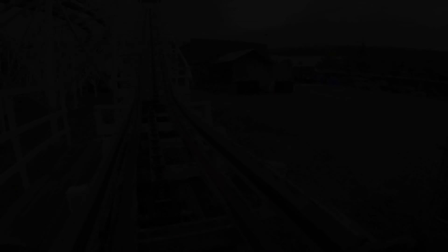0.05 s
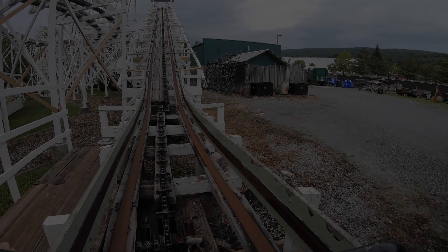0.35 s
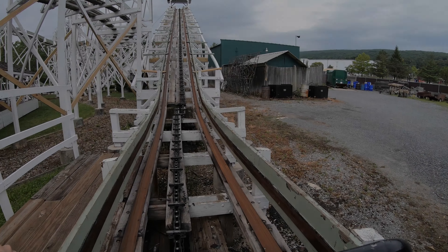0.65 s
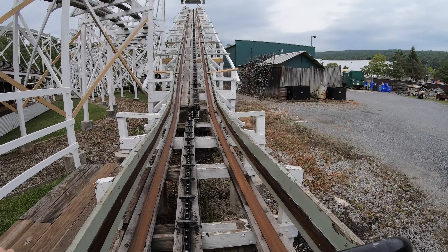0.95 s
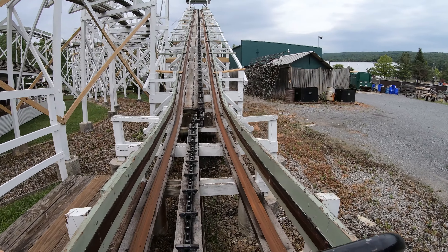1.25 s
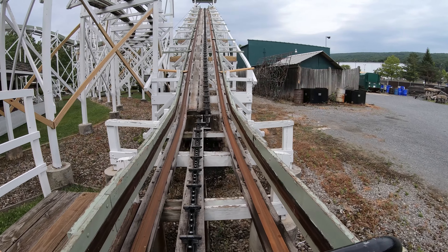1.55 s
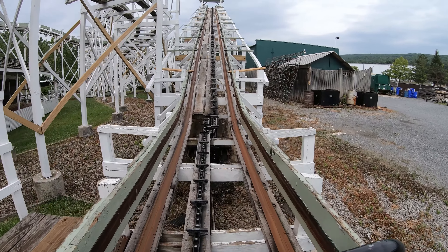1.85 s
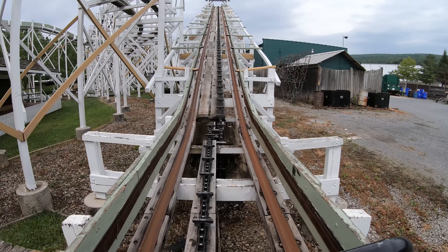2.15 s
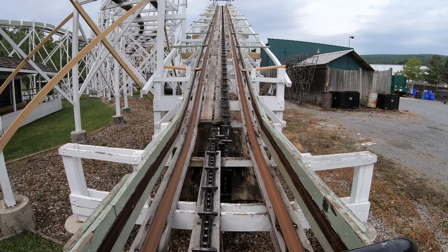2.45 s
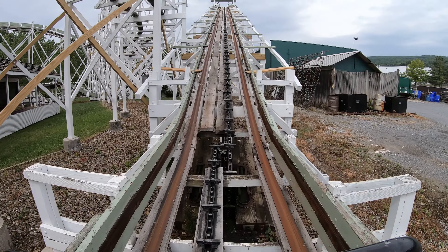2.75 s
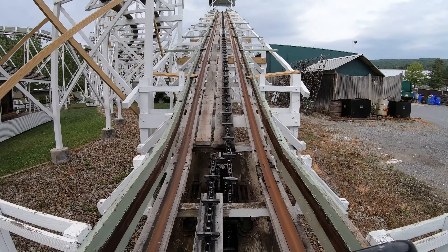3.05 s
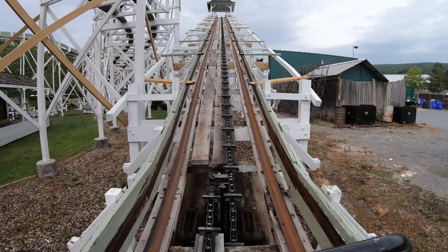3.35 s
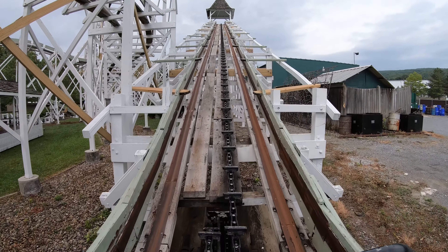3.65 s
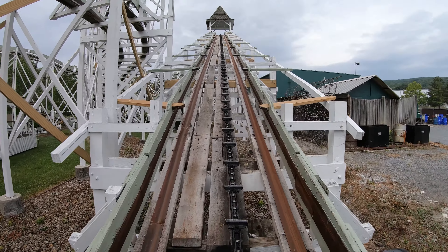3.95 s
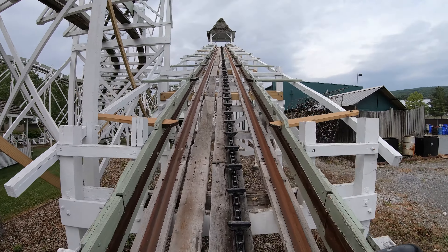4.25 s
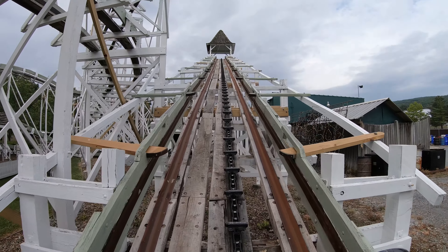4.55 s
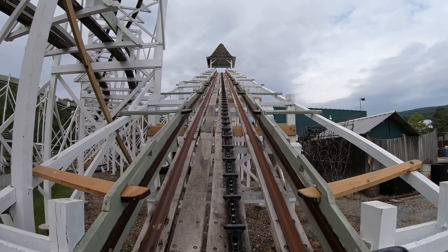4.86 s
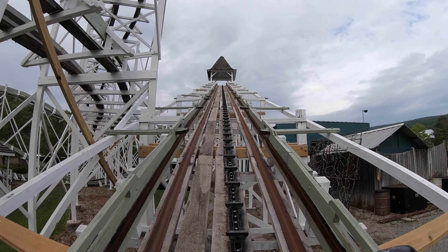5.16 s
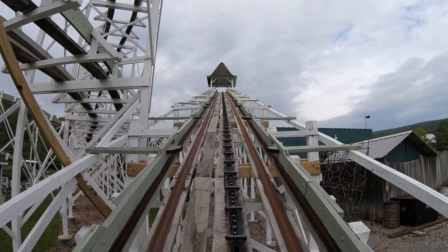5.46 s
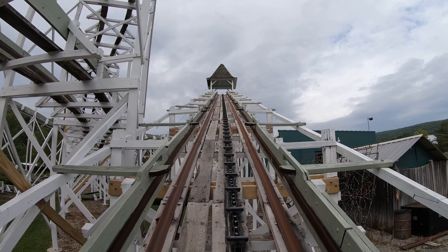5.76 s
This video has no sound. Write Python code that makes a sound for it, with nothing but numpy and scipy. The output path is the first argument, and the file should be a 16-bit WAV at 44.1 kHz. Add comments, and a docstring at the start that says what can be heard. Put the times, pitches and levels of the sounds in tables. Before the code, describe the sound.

Steel wheels chatter over booming timber as a roller coaster rolls along, with sharp metal clanks and chain rattle near the end.

```python
"""The front car of a wooden roller coaster, rolling through a dip and onto the lift hill.
Steel wheels chatter and knock on the rails, so the car rumbles and the timber track booms and sings.
Loose fittings tick and clank, rubbing steel squeaks, and air buffets the microphone.
From about four seconds the lift chain rattles underneath; the car's steel dogs clank and scrape on it."""
import sys
import numpy as np
from scipy import signal
from scipy.fft import rfft, irfft, next_fast_len
from scipy.io import wavfile
from scipy.ndimage import uniform_filter1d, map_coordinates

SR = 44100
rng = np.random.default_rng(int(sys.argv[2]) if len(sys.argv) > 2 else 0)


def put_to_file(sound):
    """Save the sound as 16-bit audio at rate SR, in the file named by the first command-line argument."""
    columns = np.atleast_2d(sound).T  # one column per channel
    safe = np.clip(columns, -1, 1)
    whole_steps = np.round(safe * 32767)
    wavfile.write(sys.argv[1], SR, whole_steps.astype(np.int16))


N = 256220
T = np.arange(N) / SR


def amp(db):
    """Decibels to gain."""
    return 10 ** (np.asarray(db) / 20)


def unit(x):
    """Scale to rms 1."""
    return x / np.sqrt(np.mean(x ** 2) + 1e-20)


def automation(points):
    """A (time, value) breakpoint curve, one value per sample."""
    return np.interp(T, *np.transpose(points))


def fade_in(power):
    """Gain that grows from silence to 1 over 0.85 s, as a power of time."""
    return np.clip(T / 0.85, 1e-6, 1) ** power


def swells(rows, rise_s, fall_s):
    """A fader ride in dB: each swell rises, holds until its length is up and falls back."""
    return sum(db * np.clip(np.minimum((T - s) / rise_s, 1 - (T - s - length) / fall_s), 0, 1)
               for s, length, db in rows)


def wobble(rate):
    """A smooth random curve, rate knots a second."""
    return map_coordinates(rng.standard_normal(int(N * rate / SR) + 4), [T * rate])


def eq(x, outline):
    """x through a minimum-phase filter with the given (Hz, dB) outline."""
    size = 2 * next_fast_len(len(x) // 2 + 2048)
    hz, db = np.transpose(outline)
    bin_db = np.interp(np.log(np.fft.rfftfreq(size, 1 / SR) + 1), np.log(hz), db)
    cepstrum = irfft(np.log(amp(bin_db)), size)
    cepstrum[1:size // 2] *= 2  # folding onto positive time makes the filter causal
    cepstrum[size // 2 + 1:] = 0
    return irfft(rfft(x, size) * np.exp(rfft(cepstrum)), size)[:len(x)]


def levelled(x, window_s):
    """x with its slow level ridden to rms 1."""
    size = int(window_s * SR) + 1
    power = uniform_filter1d(uniform_filter1d(x ** 2, size), size)
    return x / np.sqrt(np.abs(power) + 1e-12)


def add(track, s, sound):
    """Mix a sound into a track at s seconds."""
    room = track[max(round(s * SR), 0):][:len(sound)]
    room += sound[:len(room)]


def contacts(rate, jitter, spread_db):
    """Unevenly spaced impulses, about rate a second, with random size and sign."""
    gap, size, side = rng.standard_normal((4000, 3)).T
    at = (np.cumsum(np.exp(jitter * gap - jitter ** 2 / 2)) / rate * SR).astype(int)
    strength = amp(spread_db * np.tanh(size / 2) * 2) * np.sign(side)
    return np.bincount(at[at < N], strength[at < N], N)


def shaken(blows, t60, share):
    """Each blow sets loose parts buzzing briefly; share is the power in the buzz."""
    t = np.arange(SR // 4) / SR
    energy = np.abs(signal.fftconvolve(blows ** 2, amp(-60 * t / t60) ** 2)[:N])
    buzz = unit(np.sqrt(energy) * rng.standard_normal(N))
    return np.sqrt(1 - share) * unit(blows) + np.sqrt(share) * buzz


def hit(outline, t60, push):
    """One blow of peak 1: a sharp push and a dying scatter through a body's colour."""
    t = np.arange(SR // 6) / SR
    force = amp(-60 * t / t60) * rng.standard_normal(len(t))
    force[0] += push * np.linalg.norm(force)
    sound = eq(force, outline)
    return sound / np.abs(sound).max()


def wheel_jolts():
    """The rail jolts the wheels at a loose beat, which the hard knocks take over while they last."""
    jolts = contacts(rate=37, jitter=0.22, spread_db=2.5)
    clearance = round(KNOCK_BEAT_S * SR * 0.75)
    for s, *_ in knock_times():
        at = round(s * SR)
        jolts[at - clearance:at + clearance] = 0
        jolts[at] = 1
    return jolts


# the car body's low-end weight: f/Hz, level/dB
CAR_EQ = [(20, -32.5), (45, -26.5), (65, -6), (88, -0.5), (108, -1.5), (150, -7), (200, -10.5),
          (260, -33.5), (600, -95.5)]
# the body shudders in fits: t/s, length/s, boost/dB
CAR_SHUDDERS = [(1.08, 0.32, 5.5), (1.86, 0.1, 6.5), (2.11, 0.17, 5.5), (3.1, 0.19, 3.5), (3.87, .29, 5),
                (4.76, 0.304, 6), (5.13, 0.255, 3.5)]

def car_rumble(drive):
    """The shaken car body rumbles, swelling with each shudder."""
    level_db = -21.5 + swells(CAR_SHUDDERS, rise_s=0.096, fall_s=0.03)
    return fade_in(power=1) * amp(level_db) * levelled(eq(drive, CAR_EQ), window_s=0.12)


# the timber's low-mid body: f/Hz, level/dB
TIMBER_EQ = [(90, -36), (170, -14), (205, 0.5), (240, 1), (280, -0.5), (350, 1), (470, -11.5), (620, -24),
             (1400, -86)]
# its boom, fullest at the bottom of the dip: t/s, level/dB
TIMBER_FADER = [(1.0, -25), (1.55, -25), (2.05, -22), (2.95, -18.5), (3.95, -19.5), (4.6, -24.5),
                (4.82, -20), (5.8, -24)]

def timber_boom(drive):
    """The wooden track booms under the wheels."""
    boom = levelled(eq(drive, TIMBER_EQ), window_s=0.94)
    return fade_in(power=1.28) * amp(automation(TIMBER_FADER)) * boom


# wheel tone on level track: f/Hz, level/dB
FLAT_EQ = [(200, -28), (390, -2), (490, 2), (600, 7.5), (720, -3.5), (900, -13.5), (1150, -9),
           (1550, -24.5), (2000, -40), (2800, -41.5), (5000, -84)]
# wheel tone pressed into the bend: f/Hz, level/dB
BEND_EQ = [(200, -29), (400, 4), (600, 1), (800, 1.5), (1100, -7), (1500, -11), (1780, -17.5),
           (2100, -25.5), (2800, -33), (5000, -69.5)]
# crossfade between them as the track bends into the hill: t/s, bend share/0-1
BEND_MIX = [(0, 0.1), (1.45, 0.4), (1.8, 0.6), (2.2, 0.97), (3.1, 0.8), (3.55, 0.3), (4.3, 0.71),
            (5.8, 0.94)]
# swells in the wheel chatter's loudness: t/s, length/s, boost/dB
CHATTER_SWELLS = [(0.1, 0.13, 5), (0.33, 0.098, 8.5), (0.58, 0.12, 4), (1.03, 0.32, 2.5), (1.74, 0.12, 4),
                  (3.45, 0.289, 5), (3.88, 0.086, 2), (4.15, 0.16, 0.5), (5.37, 0.1, 4.5)]

def wheel_chatter(drive_flat, drive_bent):
    """Steel wheels chatter on the rail, changing colour and bearing a little harder on the bend."""
    bend = automation(BEND_MIX)
    flat = np.sqrt(1 - bend) * levelled(eq(drive_flat, FLAT_EQ), window_s=0.13)
    bent = np.sqrt(bend) * levelled(eq(drive_bent, BEND_EQ), window_s=0.39)
    level_db = -24 + 1.33 * bend + swells(CHATTER_SWELLS, rise_s=0.079, fall_s=0.025)
    return fade_in(power=1) * amp(level_db) * (flat + bent)


# the rail's jolts, bumpy through the dip and smoother onto the lift: t/s, level/dB
BUMP_FADER = [(0, -1), (1.5, -4.5), (1.8, -2), (2.6, -4), (3.5, -9), (4.1, -13), (5.8, -5)]

def rolling():
    """Car, timber and wheels feel the same jolts over fine rolling grit; returns the bed and jolts."""
    bumps = amp(automation(BUMP_FADER))
    jolts = wheel_jolts()
    grit = contacts(rate=400, jitter=0.8, spread_db=2.5)

    def drive(grit_db):
        jolting = bumps * shaken(jolts, t60=0.068, share=0.66)
        return jolting + amp(grit_db) * shaken(grit, t60=0.054, share=0.69)

    car = car_rumble(drive(grit_db=7.5))
    timber = timber_boom(drive(grit_db=-4))
    wheels = wheel_chatter(drive(grit_db=4), drive(grit_db=7))
    return car + timber + wheels, bumps * jolts


# the wind's sub-bass: f/Hz, level/dB
WIND_EQ = [(12, -9.5), (25, -12), (45, 8.5), (75, -11), (300, -80.5)]
# its buffeting: t/s, level/dB
WIND_FADER = [(1.15, -32), (1.6, -41.5), (3.7, -44.5), (4.1, -31), (5.8, -28.5)]

def wind():
    """Moving air pushes softly on the microphone."""
    buffet = levelled(eq(rng.standard_normal(N), WIND_EQ), window_s=0.5)
    return fade_in(power=1.2) * amp(automation(WIND_FADER)) * buffet


# the bright colour of loose steel: f/Hz, level/dB
RATTLE_EQ = [(1000, -6.5), (2000, 2), (2800, -4.5), (3250, -2.5), (4000, -7), (4700, -11.5), (5600, -21),
             (7600, -23), (8800, -29), (10800, -29.5), (11600, -38.5), (13000, -38), (15000, -60)]
# its rattle, harder on the lift: t/s, level/dB
RATTLE_FADER = [(1.0, -46), (3.9, -44), (4.2, -42.5), (4.6, -42.5), (5.03, -39.5), (5.55, -47),
                (5.8, -42.5)]

def rattle(jolts):
    """Steel hisses under the wheels with each jolt, and loose fittings tick at an uneven rate."""
    hiss = rng.standard_normal(N) + amp(-6) * shaken(jolts, t60=0.13, share=0.96)
    ticks = amp(-3.5) * shaken(contacts(rate=48, jitter=0.8, spread_db=0), t60=0.059, share=0.74)
    return fade_in(power=0.71) * amp(automation(RATTLE_FADER)) * unit(eq(hiss + ticks, RATTLE_EQ))


# steel rubs on steel: t/s, length/s, f/Hz, level/dB, tail t60/s
SQUEAK_CUES = [(0.105, 0.04, 4150, -48, 0.4), (5.215, 0.042, 9430, -52.5, .7), (5.3, .04, 9400, -59, 1.3)]

def squeaks():
    """Rubbing steel sings briefly on one rough, wavering mode with a weak octave, then rings out."""
    out = np.zeros(N)
    for s, length, hz, db, t60 in SQUEAK_CUES:
        progress = np.clip((T - s) / length, 0, 1)
        arch = np.sqrt(4 * progress * (1 - progress))
        phase = 2 * np.pi * np.cumsum(hz + 85 * wobble(990)) / SR
        tone = np.sin(phase) + amp(-29) * np.sin(2 * phase)
        out += amp(db + 4.3 * wobble(190)) * arch * tone
        tail_db = -10.5 - 60 * np.maximum(T - s - length, 0) / t60 + 3 * wobble(54)
        out += amp(db + tail_db) * progress * np.sin(2 * np.pi * hz * T)
    return out


# ringing modes of the chain and dog steel: f/Hz, level/dB, t60/s
STEEL_MODES = [(2060, -3.5, 0.2), (2475, -6, 0.24), (2900, -9, 0.16), (3180, -2.5, 0.14), (3410, -4, 0.15),
               (4240, -0.5, 0.08), (6300, -22, 0.73), (6100, -12, 0.082), (6492, -26, 0.8), (7470, -23, .6)]

def steel_ring(scatter_db):
    """Struck steel rings, its modes freshly weighted and slightly detuned each time."""
    t = np.arange(SR // 2) / SR
    hz, db, t60 = np.transpose(STEEL_MODES)[:, :, None]
    size, detune = rng.standard_normal((2, len(STEEL_MODES), 1))
    decays = amp(db + scatter_db * size - 60 * t / t60)
    return np.sum(decays * np.sin(2 * np.pi * hz * (1 + 0.0024 * detune) * t), axis=0)


# the broad crack of steel on steel: f/Hz, level/dB
CRACK_EQ = [(300, -31), (1200, 11), (2400, 1.5), (3400, -2.5), (4200, -5), (5500, -16.5), (8000, -34),
            (14000, -52.5)]
# its top-end shine: f/Hz, level/dB
SHINE_EQ = [(3000, -28), (6500, 6), (7800, 6.5), (10000, -6), (12000, -6), (15000, -25.5)]
# the strikes: t/s, level/dB, relative shine/dB, struck part's f/Hz
CLANK_CUES = [(0.157, -35.5, -28, 4100), (0.2478, -36, -24, 3220), (0.3616, -33.5, -19.5, 4300),
              (0.408, -27.5, -28.5, 3600), (0.491, -35, -18, 3500), (0.574, -26.5, -16, 3980),
              (0.675, -28.5, -28, 3500), (0.858, -28.5, -27, 3220), (1.06, -27.5, -27, 3800),
              (1.1181, -20, -30, 2400), (1.328, -26.5, -31, 3800), (1.355, -22.5, -22, 3800),
              (3.242, -20, -24, 2720), (3.3297, -26.5, -19, 2820), (4.097, -27, -15, 4270),
              (4.14, -11.5, -23.5, 3370), (4.418, -24.5, -29, 4500), (4.661, -15, -17.5, 3300),
              (4.884, -18, -29, 2450), (4.9028, -18, -22, 3400), (4.934, -13, -26.5, 3900),
              (5.137, -22.5, -31, 2520), (5.205, -17.5, -22, 2350), (5.351, -22, -28, 3300),
              (5.3846, -21.5, -25, 3300), (5.493, -31, -18, 3000), (5.773, -25.5, -30, 3000)]

def clanks():
    """Fittings and chain dogs strike: a light touch, a crack coloured by the struck part, a ring."""
    out = np.zeros(N)
    touch_lead_s, touch_db = 0.01, -9
    for s, db, shine_db, part_hz in CLANK_CUES:
        part = signal.iirpeak(part_hz, Q=7, fs=SR)
        for at, level in ((s - touch_lead_s, db + touch_db), (s, db)):
            crack = amp(level - 2) * hit(CRACK_EQ, t60=0.052, push=0.38)
            add(out, at, crack + amp(5.5) * signal.lfilter(*part, crack))
            add(out, at, amp(level + shine_db) * hit(SHINE_EQ, t60=0.042, push=0.2))
        add(out, s, amp(1.6 * db - 14.5) * steel_ring(scatter_db=1.2))  # hard blows ring far more
    return out


# a wheel knocks in runs, at a steady beat: t/s, count, level/dB, relative edge/dB
KNOCK_CUES = [(0.273, 1, -17.5, -9), (0.45, 1, -11, -11.5), (0.481, 1, -9.5, -19), (0.531, 1, -11.5, -16),
              (0.589, 6, -10, -9.5), (0.739, 1, -7, -8), (0.771, 1, -13.5, -5), (0.789, 1, -7.5, -19),
              (0.875, 2, -5, -9.5), (0.955, 4, -6, -21), (1.09, 2, -8, -7.5), (1.167, 4, -9.5, -14.5),
              (1.303, 2, -7, -11), (1.379, 4, -5.5, -14), (1.492, 2, -6, -12), (1.569, 1, -11, -5.5),
              (1.62, 4, -9, -5), (1.776, 2, -14, 0.5), (1.853, 2, -10, -3), (1.914, 1, -9, -7.5),
              (2.019, 2, -12.5, -1.5), (2.088, 1, -15.5, 2.5), (2.145, 2, -14, 3.5), (2.266, 3, -11.5, -1),
              (2.372, 2, -11.5, -3), (2.452, 2, -10.5, -9), (2.554, 1, -13, -0.5), (2.683, 5, -10, -5.5),
              (2.992, 2, -15.5, 0.5), (3.122, 1, -10.5, -2.5), (3.242, 1, -9, -1.5), (3.42, 2, -8.5, -6),
              (3.523, 1, -6, -21), (3.986, 1, -6, -21), (4.259, 1, -15, -20), (4.801, 2, -18, 4.5),
              (4.896, 1, -10, -1), (5.262, 1, -8.5, 3), (5.318, 1, -14, 2), (5.478, 1, -18, -1),
              (5.511, 1, -6, -11)]
KNOCK_BEAT_S = 0.0272

def knock_times():
    """Every knock of every run: t/s, level/dB, relative edge/dB."""
    return [(s + beat * KNOCK_BEAT_S, db, edge_db)
            for s, count, db, edge_db in KNOCK_CUES for beat in range(count)]


# a knock's dead wooden body: f/Hz, level/dB
KNOCK_EQ = [(60, -8.5), (250, -11), (450, 2), (620, 3.5), (850, -4.5), (1100, -20.5), (1800, -30),
            (4000, -75.5), (15000, -100)]
# its hard edge: f/Hz, level/dB
EDGE_EQ = [(400, -39.5), (900, 6.5), (1520, 3), (2050, -11.5), (3000, -23), (6000, -48), (15000, -76.5)]

def knocks():
    """The hardest wheel blows: a wooden knock with a hard edge, rebounding most on the bend."""
    out = np.zeros(N)
    for s, db, edge_db in knock_times():
        pitch, flight = rng.standard_normal(2)
        retuned_eq = np.multiply(KNOCK_EQ, [np.exp(0.05 * pitch), 1])
        add(out, s, amp(db) * hit(retuned_eq, t60=0.031, push=1.66))
        flight_s = 0.009 * 2 ** (flight / 2)
        rebound = np.interp(s, *np.transpose(BEND_MIX)) / 2  # second strike's share of the edge's power
        for at, share in ((s, 1 - rebound), (s + flight_s, rebound)):
            add(out, at, np.sqrt(share) * amp(db + edge_db) * hit(EDGE_EQ, t60=0.04, push=0.24))
    return out


# stretches of hollow timber sing under the wheels: t/s, length/s, f/Hz, level/dB
HOLLOW_CUES = [(1.552, 0.35, 385, -26.5), (1.88, .6, 343.4, -23), (2.646, 0.88, 235, -21),
               (3.806, 0.65, 419, -28.5), (4.244, .05, 639, -21.5), (4.537, .07, 542, -23),
               (5.45, 0.085, 688, -18.5)]

def hollow_timber(jolts):
    """Each hollow stretch resonates at its own pitch, swelling and fading as the car crosses it."""
    out = np.zeros(N)
    drive = shaken(jolts, t60=0.13, share=0.99)
    for s, length, hz, db in HOLLOW_CUES:
        progress = np.clip((T - s) / length, 0, 1)
        arch = np.sqrt(4 * progress * (1 - progress))
        tone = signal.lfilter(*signal.iirpeak(hz, Q=12, fs=SR), drive)
        tone = signal.lfilter(*signal.iirpeak(hz, Q=2, fs=SR), tone)  # trims the noisy skirts
        out += amp(db) * arch * levelled(tone, window_s=length / 2)
    return out


# the jingle of links in their trough: f/Hz, level/dB
CHAIN_EQ = [(1200, -15.5), (2400, 13.5), (3400, 19), (4400, 3), (5400, 0.5), (6400, -1.5), (7800, -1.5),
            (8900, -15.5), (10600, -11), (11600, -20), (13500, -25.5), (15000, -31.5)]
# the chain comes in under the car: t/s, level/dB
CHAIN_FADER = [(3.95, -80), (4.2, -44), (4.55, -59.5), (4.68, -47.5), (5.0, -45), (5.27, -59), (5.48, -46),
               (5.55, -59)]

def lift_chain():
    """Links clatter in their trough, each tick briefly ringing the steel."""
    links = shaken(contacts(rate=38, jitter=0.99, spread_db=3), t60=0.046, share=1)
    ringing = unit(signal.fftconvolve(links, steel_ring(scatter_db=1))[:N])
    return amp(automation(CHAIN_FADER)) * unit(eq(links + amp(-11.5) * ringing, CHAIN_EQ))


# a dog scrapes along the chain: t/s, length/s, level/dB
SCRAPE_CUES = [(4.76, .2, -39), (5.007, 0.069, -37.5), (5.419, .105, -38.5)]

def dog_scrapes():
    """A dog drags over the chain: dense, tiny slips that start and stop abruptly."""
    out = np.zeros(N)
    ramp_s = 0.013
    slips = shaken(contacts(rate=170, jitter=0.7, spread_db=2.5), t60=0.07, share=0.6)
    rasp = unit(eq(slips, RATTLE_EQ))
    for s, length, db in SCRAPE_CUES:
        gate = np.clip(np.minimum(T - s, s + length - T) / ramp_s, 0, 1)
        out += amp(db) * gate * rasp
    return out


def scene():
    """A mono mix in open air; every source rides along with the listener."""
    bed, jolts = rolling()
    ride = bed + hollow_timber(jolts) + knocks()
    steel = rattle(jolts) + lift_chain() + dog_scrapes() + clanks() + squeaks()
    return (ride + steel + wind())[None]


# the mix opens quickly from near silence: t/s, level/dB
MASTER_FADER = [(0.066, -45), (0.08, -13), (0.1, 0)]

def record(dry):
    """Master chain: fade up, round off the peaks, cut the extreme top."""
    ceiling, top_hz = 0.8, 15100
    faded = dry * amp(automation(MASTER_FADER))
    rounded = faded / (1 + np.abs(faded / ceiling) ** 6) ** (1 / 6)
    size = next_fast_len(N + SR // 2)
    passband = np.fft.rfftfreq(size, 1 / SR) < top_hz
    return irfft(rfft(rounded, size) * passband, size)[:, :N]


dry = scene()
out = record(dry)
put_to_file(out)
```